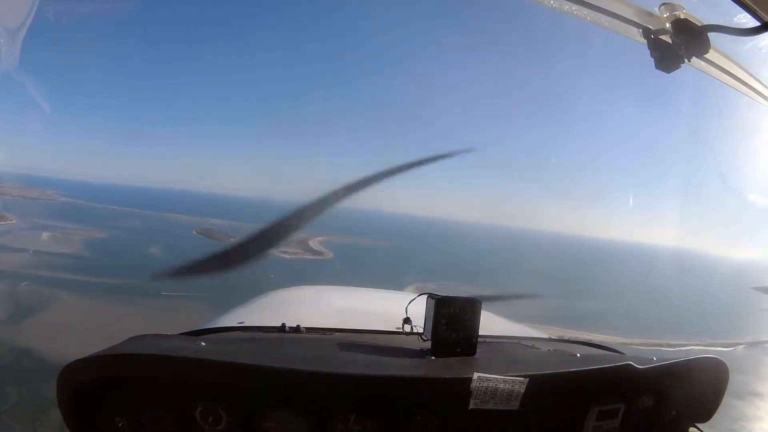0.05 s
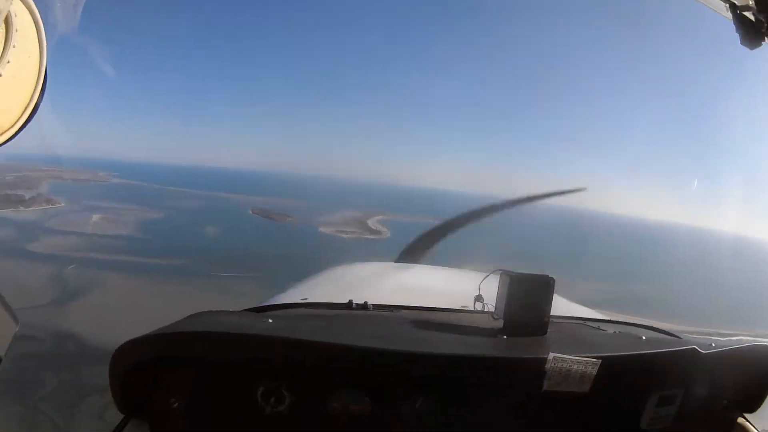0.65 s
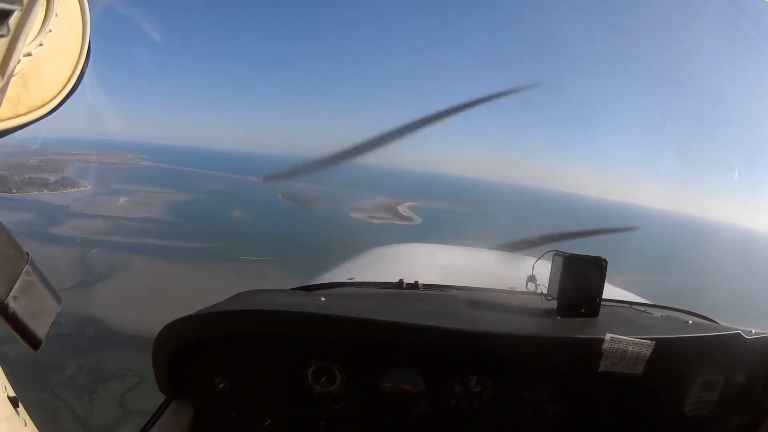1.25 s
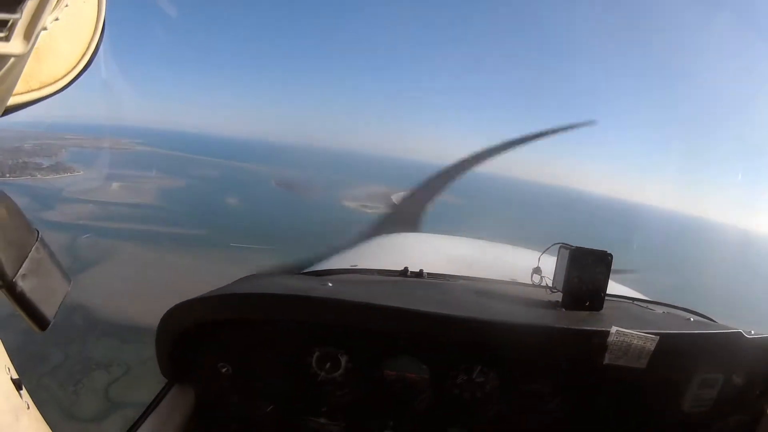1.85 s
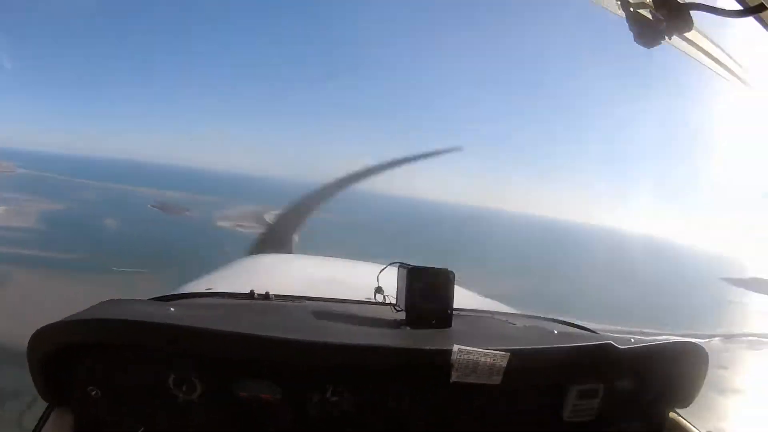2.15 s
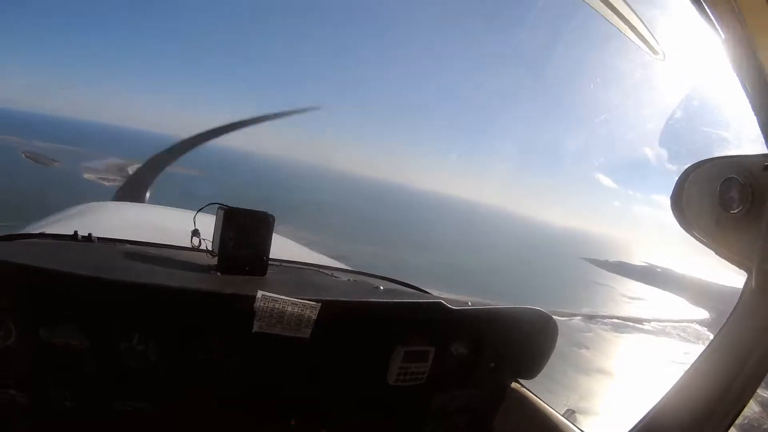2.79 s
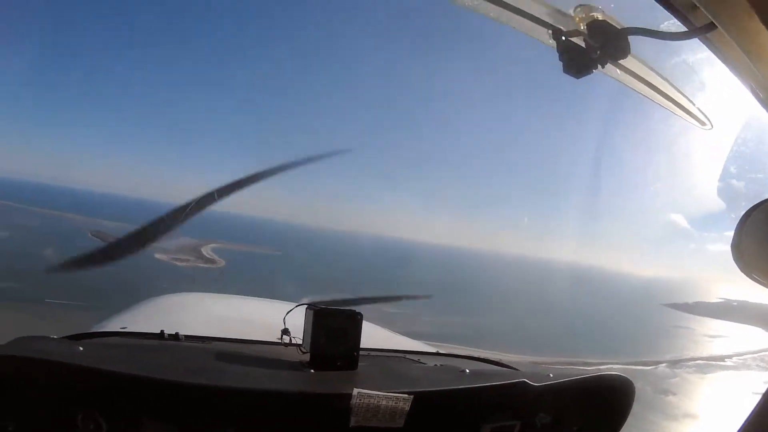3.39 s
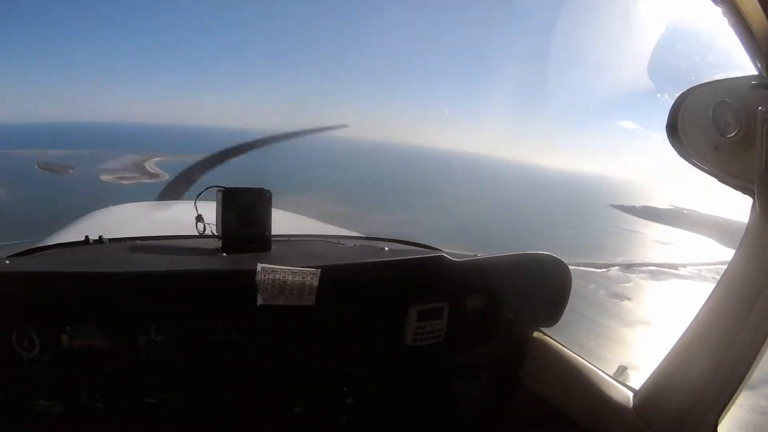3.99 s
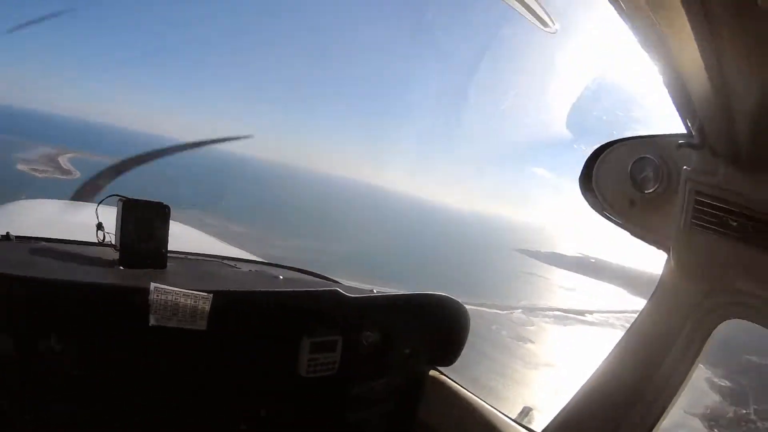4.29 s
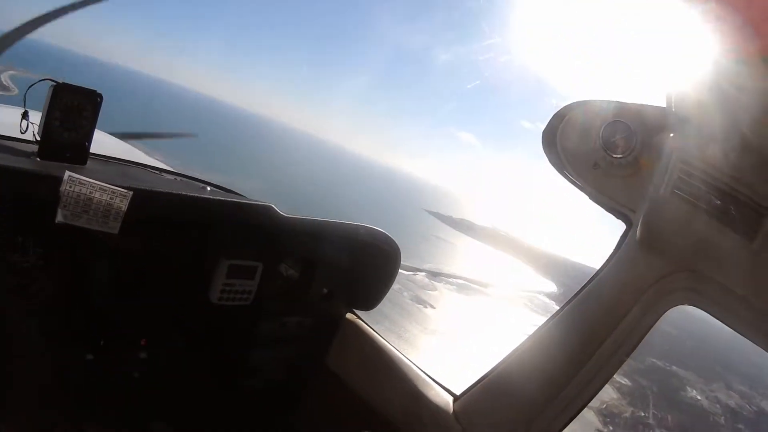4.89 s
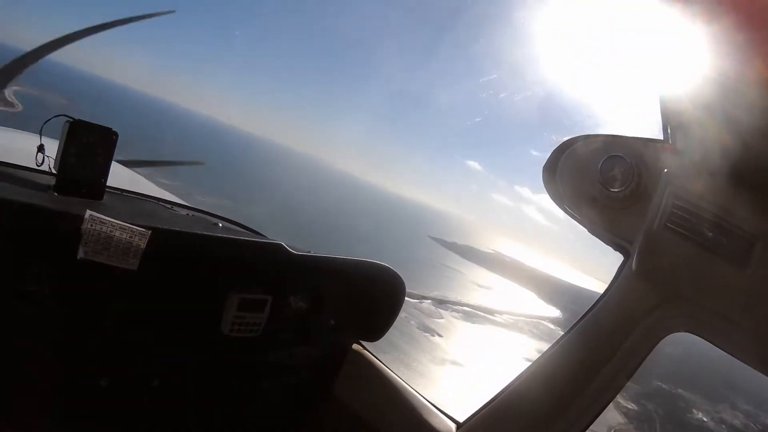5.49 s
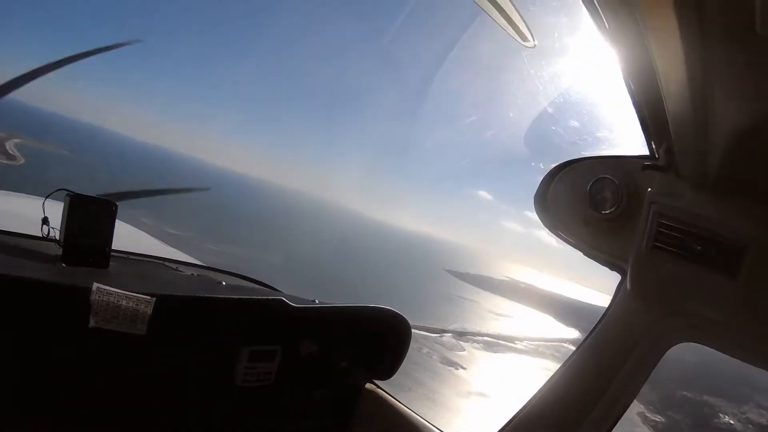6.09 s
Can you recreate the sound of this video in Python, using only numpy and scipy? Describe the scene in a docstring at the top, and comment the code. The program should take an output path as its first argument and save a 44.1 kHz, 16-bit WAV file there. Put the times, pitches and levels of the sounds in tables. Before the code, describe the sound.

A small plane's piston engine and propeller drone at a constant low pitch throughout, picked up from inside the cabin. Slightly harder firings and faint, brief panel rings roughen the sound now and then, over a low rumble and a rush of air. Partway through, the overtones shift subtly as the microphone turns toward the side, where a door seal whistles very faintly.

```python
"""Inside the cockpit of a light aircraft in level flight, a four-cylinder engine turns a two-blade propeller.
Firings and blade passes recur twice a shaft turn, and their periodic pressure makes a deep drone.
Each firing also throws a turbulent puff and a sharp kick into the cabin; the puffs set a panel ringing.
Beneath lie the rumble of the airframe, the rush of air and a faint whistle from a door seal.
Midway the microphone turns right through the cabin's standing waves, so the overtones change balance."""
import sys
import numpy as np
from scipy import signal
from scipy.fft import rfft, irfft
from scipy.io import wavfile

SR = 44100
rng = np.random.default_rng(int(sys.argv[2]) if len(sys.argv) > 2 else 0)


def log_audio(samples):
    """Write samples as a 16-bit WAV file to the path given in sys.argv[1]."""
    # one column per channel
    frames = np.atleast_2d(samples).T
    # limit to full scale, then quantise
    limited = np.clip(frames, -1, 1)
    pcm = np.round(limited * 32767).astype(np.int16)
    wavfile.write(sys.argv[1], SR, pcm)


N = 275625
TIME = np.arange(N) / SR

# rotation of the shaft: (time [s], speed [turns/s])
SHAFT_SPEED = [(0, 38.54), (2.1, 38.56), (2.7, 38.45), (3.9, 38.3), (4.6, 38.42), (5.5, 38.4),
               (6.25, 38.34)]
# direction of the microphone: (time [s], facing [0 ahead, 1 right])
FACING = [(0, 0.14), (1, 0.081), (2, 0.033), (2.55, 0.7), (3.4, 0.66), (4.5, 0.79)]
# the firing note, at twice the shaft speed: (time [s], level [dB])
FIRING_LEVEL = [(0, -19.8), (.77, -20.5), (1.08, -22.5), (1.25, -20.5), (2.2, -20), (2.9, -21.8),
                (3.7, -22), (4.5, -22), (5.3, -23), (6.25, -22)]
# strong overtones at 6, 8, 12 and 13 times the shaft speed: (time [s], relative level [dB])
ORDER_6 = [(0, -35), (0.35, -35), (0.75, -44), (0.95, -37), (2.3, -37.5), (3.1, -35), (3.45, -30.5),
           (4.001, -38.5), (4.7, -34), (5.25, -36), (5.6, -34.5), (6.25, -35.5)]
ORDER_8 = [(0, -37.5), (0.6, -33), (1.299, -32), (1.75, -38.5), (2.2, -35), (2.7, -51), (3.0, -35),
           (3.5, -44.5), (4.0, -36.5), (4.9, -41.5), (5.4, -41.5), (6.25, -40)]
ORDER_12 = [(0, -53), (0.35, -53), (0.6, -33.5), (0.85, -44.5), (1.2, -49), (1.5, -37), (2.199, -40),
            (2.7, -41), (3.3, -46.5), (6.25, -50.5)]
ORDER_13 = [(0, -42.5), (1.0, -48), (2.1, -40), (3.097, -56), (6.25, -46.5)]
# weak tones, half orders from unequal cylinders:
# (order [multiple of shaft speed], relative level ahead [dB], relative level right [dB])
WEAK_ORDERS = [(1, -43.5, -38.5), (2.5, -44, -48), (3, -41, -38), (3.5, -37.5, -43.5), (4, -42.5, -47),
               (4.5, -45, -41.5), (5, -41, -47), (5.5, -43, -59), (7, -41.5, -52.5), (8.5, -47.5, -49),
               (9, -49.5, -41), (10, -43.5, -54.5), (11, -52.5, -45.5), (11.5, -45, -52), (14, -60.5, -47),
               (15, -48.5, -58), (16, -61.5, -50.5), (18, -61, -56.5), (20, -55, -56), (22, -53.5, -58),
               (26, -63, -57)]
# each cylinder's puff, in firing order: (relative level [dB])
CYLINDER_BALANCE = (-0.57, 1, -0.97, 0.2)
# the engine's roar: (time [s], relative level [dB])
ROAR_LEVEL = [(0, -27.5), (0.55, -22.5), (0.85, -22), (1.3, -22.7), (1.8, -27), (2.7, -25.5), (3.05, -24.5),
              (3.35, -21.5), (3.7, -23), (4.3, -23.5), (6.25, -24.5)]
# firings that bark above the rest: (time [s], impulse strength [dB])
BARKS = [(0.255, -17.5), (0.648, -15), (0.661, -18), (0.688, -15.5), (0.804, -16.5), (1.425, -17),
         (1.491, -17), (2.189, -18), (2.292, -18), (2.451, -18), (3.509, -18), (3.794, -19), (3.816, -18.5),
         (4.133, -16), (4.276, -17), (4.392, -19), (5.149, -16.5), (5.172, -18), (5.325, -19.5),
         (5.483, -17), (5.538, -14.5), (5.588, -16.5), (5.915, -18.5), (6.019, -19), (6.213, -17.5)]
# moments when the panel rings out: (start [s], fade delay [s], frequency [Hz], level [dB])
PANEL_RINGS = [(.53, 0.051, 798, -38), (0.933, 0.034, 860, -45), (1.118, 0.067, 844, -34.5),
               (2.895, 0.12, 875, -42), (5.132, 0.065, 900, -36.5), (5.469, 0.072, 888, -34.5),
               (5.543, 0.12, 893, -40.5)]
# moments when the roar rasps: (time [s], length [s], level [dB])
RASPS = [(0.44, 0.16, -42.5), (3.475, 0.042, -39.5)]
# air through the door seal: (level ahead [dB], level right [dB])
SEAL_LEVELS = (-64, -54)
# gusts that swell the seal's whistle: (time [s], length [s], lift [dB])
GUSTS = [(0.4, .2, 8), (2.623, 0.28, 5.5), (4.26, 0.33, 4), (5.92, 0.2, 5)]
# cabin resonances and notches: (frequency [Hz], width [Hz], lift ahead [dB], lift right [dB])
CABIN_MODES = [(171, 85, 5.5, -1), (260, 35, 1.5, -4), (416, 42, 0, -5), (440, 75, 4.5, 0.5),
               (637, 66, 6.5, 3.5), (688, 31, 2.5, 6), (1121, 62, 6, 4.5), (1483, 43, -3, -8.5),
               (1543, 58, 5, -0.5)]
# spectral envelopes: (frequency [Hz], relative spectral density [dB])
FIREWALL_SPECTRUM = [(60, -21), (130, -3), (220, -2.5), (280, 0), (350, -0.1), (525, -1), (570, -11.5),
                     (780, -6), (920, -12), (1020, -19.5), (1400, -20.5), (2200, -33), (4000, -44),
                     (8000, -52)]  # puffs heard through the firewall
KICK_SPECTRUM = [(150, -14), (400, -3), (520, 0), (580, -3), (680, 0), (780, -3), (870, -1), (1100, -13),
                 (2000, -31), (4000, -44), (8000, -50)]  # a firing's pressure kick
PANEL_SPECTRUM = [(500, -44), (770, -14), (830, 0), (885, -.5), (950, -13), (1400, -43)]  # the panel's resonance
RASP_SPECTRUM = [(700, -31.5), (1100, 14), (1550, -7.5), (2200, -33.5), (5000, -42)]  # the bright edge of the roar
RUMBLE_SPECTRUM = [(8, -23), (22, 0), (35, 2.5), (55, -4.5), (90, -1), (130, 0.8), (200, -9), (400, -13),
                   (800, -17.5), (1500, -54)]  # the buffeted airframe
SLIPSTREAM_SPECTRUM = [(200, -0.5), (1000, 2.5), (1450, 1), (2100, -1.5), (2600, -5), (3100, -8),
                       (4100, -8), (5000, -12.5), (6100, -18.5), (7600, -20.5), (8200, -33.5)]  # air over the canopy
SEAL_SPECTRUM = [(1400, -46), (1780, -9), (1900, 6.5), (2150, -5), (2700, -26)]  # the door seal's broad whistle


def drone(turns, facing, strong_db=0.83, weak_db=0.5):
    """Periodic forcing gives tones locked to the shaft; uneven combustion shakes the overtones."""
    def tone(order, level_db, unsteadiness, start_phase):
        shake = 1 + unsteadiness * (wander(8) + 1j * wander(8))  # in both amplitude and phase
        phasor = np.exp(2j * np.pi * (order * turns + start_phase))
        return gain_of(level_db) * np.sqrt(2) * (shake * phasor).imag

    out = tone(2, curve(FIRING_LEVEL), unsteadiness=0.055, start_phase=0)
    for order, levels in (6, ORDER_6), (8, ORDER_8), (12, ORDER_12), (13, ORDER_13):
        out += tone(order, strong_db + curve(levels), unsteadiness=0.05, start_phase=rng.random())
    for order, *levels_db in WEAK_ORDERS:
        level_db = weak_db + level_facing(levels_db, facing)
        out += tone(order, level_db, unsteadiness=0.25, start_phase=rng.random())
    return out


def puffs(turns, uneven_db=3.1, floor=0.5):
    """Pulsed turbulence: each firing is a burst of noise that swells, holds and dies away."""
    lead, rise, hold_until, decay = 0.43, 0.17, 0.55, 0.13  # fractions of a firing cycle
    cycles = 2 * turns + lead
    firing, phase = cycles.astype(int), cycles % 1
    chance = rng.uniform(-1, 1, firing[-1] + 1)[firing]
    cylinder_db = np.array(CYLINDER_BALANCE)[firing % len(CYLINDER_BALANCE)]
    strength = gain_of(uneven_db * chance + cylinder_db)
    burst = np.minimum(phase / rise, 1) * np.exp(-np.maximum(phase - hold_until, 0) / decay)
    return (floor + strength * burst) * rng.standard_normal(N)


def lulls(length_s=0.012, before_s=0.005, dip_db=-6.0):
    """Cycle-to-cycle variation: a weak firing precedes a hard one, so the gain dips before each bark."""
    return gain_of(dip_db * sum(swell(time - before_s, length_s) for time, _ in BARKS))


def exhaust(drive, facing, trim_db=-5.5, turned_db=-2.0, surge_db=0.5):
    """Transmission through the firewall filters the puffs into a roar, which surges a little."""
    level_db = trim_db + curve(ROAR_LEVEL) + turned_db * facing + surge_db * wander(6)
    return gain_of(level_db) * in_cabin(blur_bass(drive), FIREWALL_SPECTRUM, facing)


def blur_bass(drive, crossover_hz=388.0):
    """Temporal overlap: in the bass each puff rings into the next, so steady noise stands for them."""
    lowpass = signal.butter(2, crossover_hz, fs=SR, output="sos")
    highpass = signal.butter(2, crossover_hz, "high", fs=SR, output="sos")
    churn = signal.sosfilt(lowpass, rng.standard_normal(N))
    return churn + signal.sosfilt(highpass, unit_rms(drive))


def kicks(turns, mean_db=-25.5, spread_db=4.5, jitter_s=0.0012):
    """Impulse excitation: every firing sends a pressure kick through the firewall; the hardest bark."""
    firings = np.flatnonzero(np.diff(np.floor(2 * turns)))
    delays = (rng.standard_normal(len(firings)) * jitter_s * SR).astype(int)
    strengths_db = mean_db + spread_db * rng.uniform(-1, 1, len(firings))
    impulses = np.zeros(N)
    impulses[np.clip(firings + delays, 0, N - 1)] = gain_of(strengths_db)
    impulses *= lulls() ** 2
    for time, db in BARKS:
        impulses[min(round(time * SR), N - 1)] = gain_of(db)
    pressure = colour(-impulses, KICK_SPECTRUM)
    return pressure * impulses.max() / abs(pressure).max()


def panel(drive, hum_db=-44.0, restless_db=2.0, rise_s=0.039, fade_s=0.032, waver=0.5):
    """Forced resonance: the puffs keep a panel humming, and now and then it rings out on one pitch."""
    out = gain_of(hum_db + restless_db * wander(5.8)) * colour(drive, PANEL_SPECTRUM)
    for start, fade_delay, hz, db in PANEL_RINGS:
        age = TIME - start
        envelope = np.clip(age / rise_s, 0, 1) * np.exp(-np.maximum(age - fade_delay, 0) / fade_s)
        shake = 1 + waver * (wander(40) + 1j * wander(40))
        ring = unit_rms((shake * np.exp(2j * np.pi * hz * TIME)).real)
        out += gain_of(db) * envelope * ring
    return out


def rasp(drive):
    """Spectral emphasis: a higher band of the puffs swells briefly, so the roar brightens and rasps."""
    envelope = sum(gain_of(db) * swell(time, length) for time, length, db in RASPS)
    return envelope * colour(drive, RASP_SPECTRUM)


def airframe(facing, level_db=-28.0, turned_db=-1.5, buffet_db=0.45):
    """Random forcing: panels rumble under the buffeting of the propeller wash."""
    rumble = colour(rng.standard_normal(N), RUMBLE_SPECTRUM)
    return rumble * gain_of(level_db + turned_db * facing + buffet_db * wander(24))


def slipstream(facing, level_db=-42.0, turned_db=-2.35, flutter_db=0.64):
    """Flow noise: air hisses over the canopy and through its seals, fluttering a little."""
    hiss = in_cabin(rng.standard_normal(N), SLIPSTREAM_SPECTRUM, facing)
    return hiss * gain_of(level_db + turned_db * facing + flutter_db * wander(70))


def door_seal(facing, flutter_db=1.0, flutter_hz=5.4):
    """An unsteady air jet sings in the gap, louder in gusts and when the microphone faces the door."""
    level_db = level_facing(SEAL_LEVELS, facing) + flutter_db * wander(flutter_hz)
    level_db += sum(lift_db * swell(time, length) for time, length, lift_db in GUSTS)
    return gain_of(level_db) * colour(rng.standard_normal(N), SEAL_SPECTRUM)


def in_cabin(x, spectrum, facing):
    """Standing waves colour a sound; the share of each depends on where the microphone faces."""
    ahead = colour(x, spectrum, [(hz, width, db) for hz, width, db, _ in CABIN_MODES])
    right = colour(x, spectrum, [(hz, width, db) for hz, width, _, db in CABIN_MODES])
    return (1 - facing) * ahead + facing * right


def level_facing(levels_db, facing):
    """Directional dependence: a level moves from its value ahead to its value on the right."""
    ahead_db, right_db = levels_db
    return ahead_db + facing * (right_db - ahead_db)


def colour(x, spectrum, modes=(), size=8192):
    """Minimum-phase filtering imposes a spectral envelope and resonances; the result has rms 1."""
    hz = abs(np.fft.fftfreq(size, 1 / SR))
    knots_hz, knots_db = np.transpose(spectrum)
    db = np.interp(np.log(hz + 1), np.log(knots_hz + 1), knots_db)
    db += sum(lift / (1 + (2 * (hz - centre) / width) ** 2) for centre, width, lift in modes)
    log_response = np.conj(signal.hilbert(np.log(gain_of(db))))  # phase follows from log magnitude
    impulse_response = np.fft.ifft(np.exp(log_response)).real
    return unit_rms(signal.oaconvolve(x, impulse_response[:size // 2])[:N])


def wander(rate_hz, control_hz=500, size=4096):
    """Random modulation: noise of rms 1 whose spectrum falls away above rate_hz."""
    hz = np.fft.rfftfreq(size, 1 / control_hz)
    slow = irfft(rfft(rng.standard_normal(size)) * np.exp(-(hz / rate_hz) ** 2))
    return unit_rms(np.interp(TIME * control_hz, np.arange(size), slow))


def swell(centre_s, length_s):
    """A Gaussian envelope rises and falls around one moment."""
    return np.exp(-(2 * (TIME - centre_s) / length_s) ** 2)


def curve(rows):
    """Linear interpolation joins rows of (time [s], value)."""
    return np.interp(TIME, *np.transpose(rows))


def gain_of(db):
    """The decibel law: 20 dB is a factor of ten in amplitude."""
    return 10 ** (np.asarray(db) / 20)


def unit_rms(x):
    """Normalisation scales a signal to rms 1."""
    return x / np.sqrt(np.mean(x ** 2) + 1e-20)


def scene():
    """Superposition: one shaft times the tones, puffs and kicks, and air noise adds beneath them."""
    turns = np.cumsum(curve(SHAFT_SPEED)) / SR
    facing = curve(FACING)
    drive = puffs(turns) * lulls()
    engine = drone(turns, facing) + exhaust(drive, facing) + panel(drive) + rasp(drive) + kicks(turns)
    return (engine + airframe(facing) + slipstream(facing) + door_seal(facing))[None]


def record(dry):
    """Band limiting: a low-pass filter removes the top treble, and a short taper softens both ends."""
    cutoff_hz = 8050
    lowpass = signal.firwin(181, cutoff_hz, window=("kaiser", 8), fs=SR)
    taper = signal.windows.tukey(N, 0.001)
    return signal.oaconvolve(dry * taper, lowpass[None], "same", axes=1)


dry = scene()
out = record(dry)
log_audio(out)
```